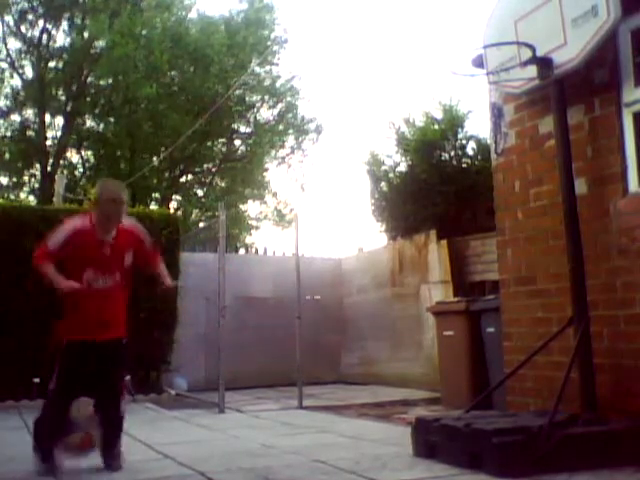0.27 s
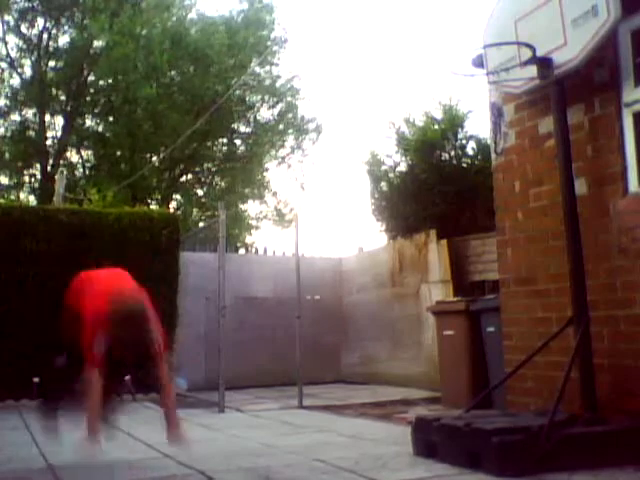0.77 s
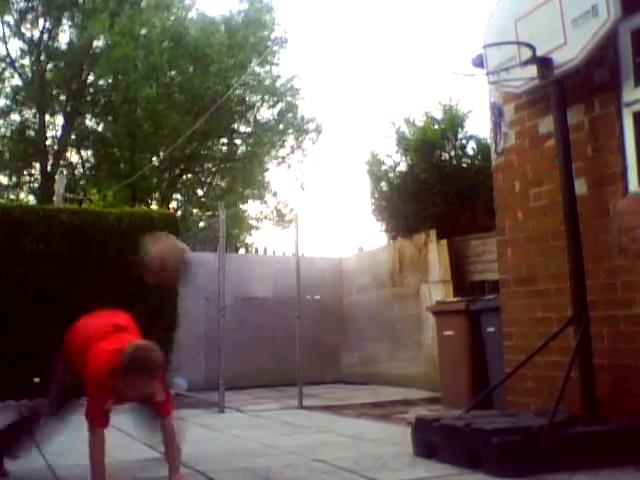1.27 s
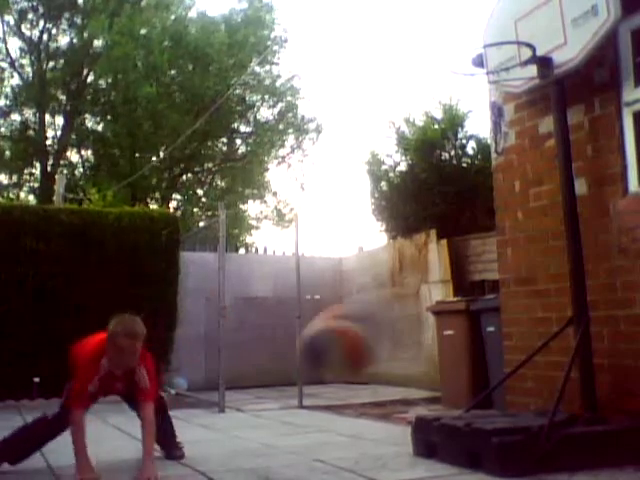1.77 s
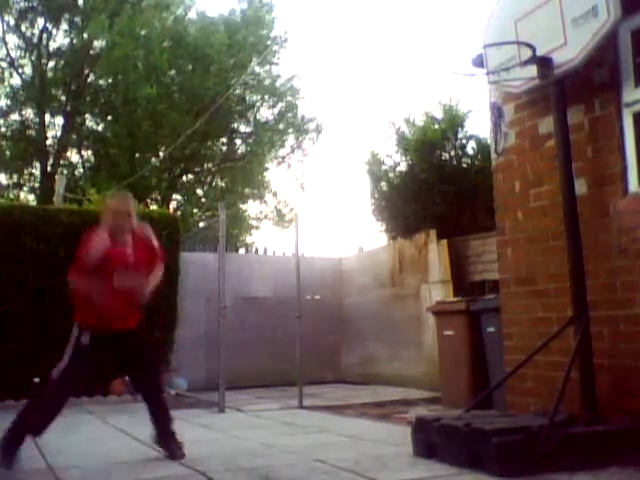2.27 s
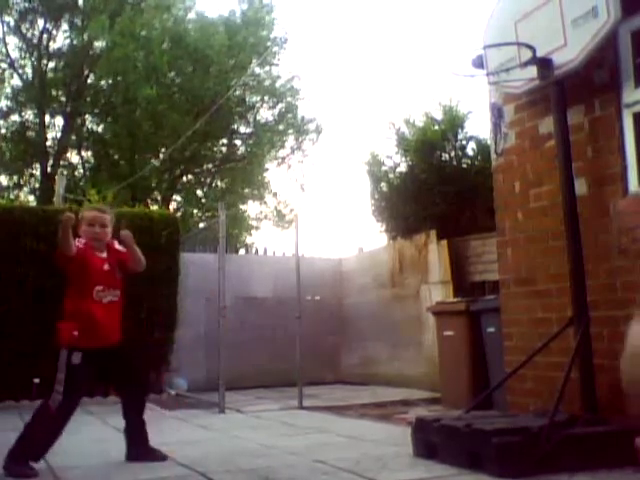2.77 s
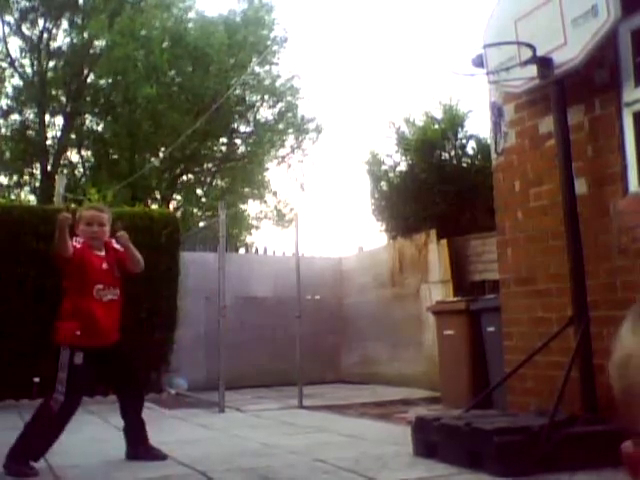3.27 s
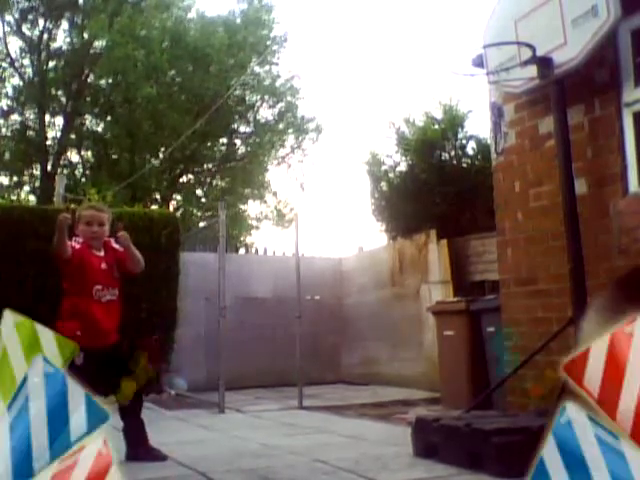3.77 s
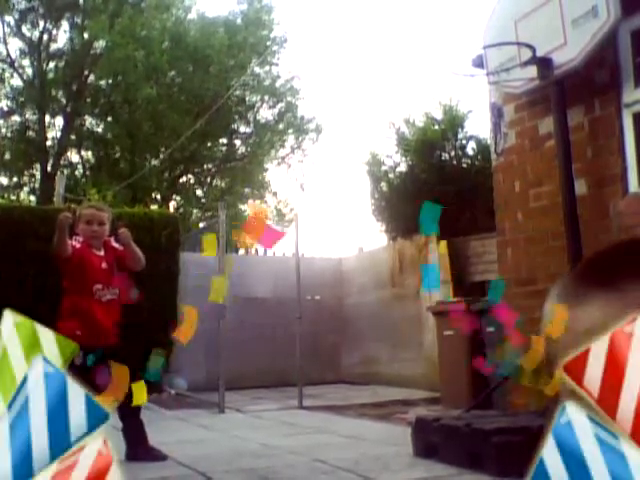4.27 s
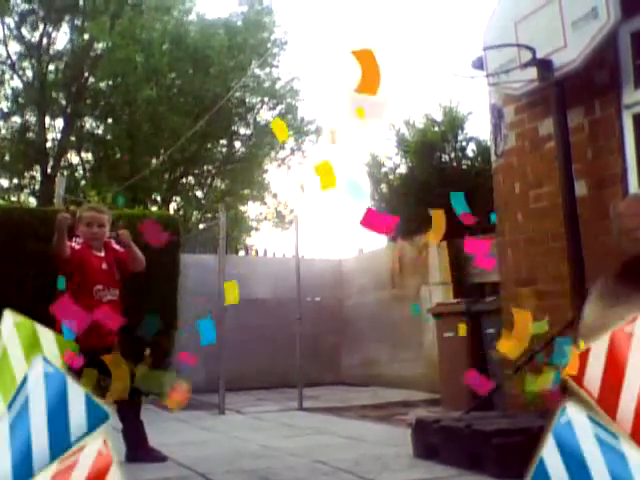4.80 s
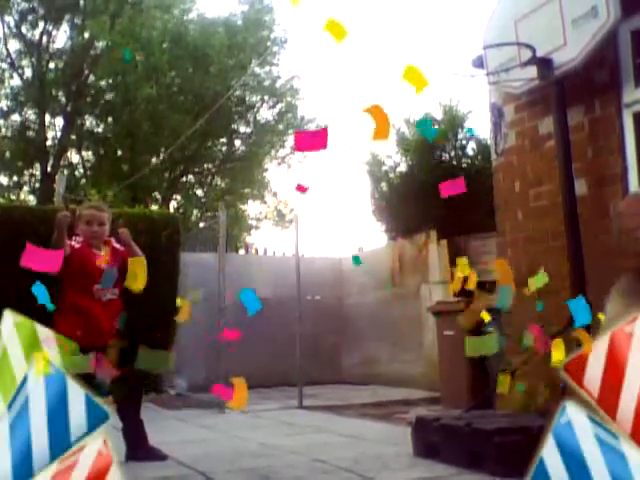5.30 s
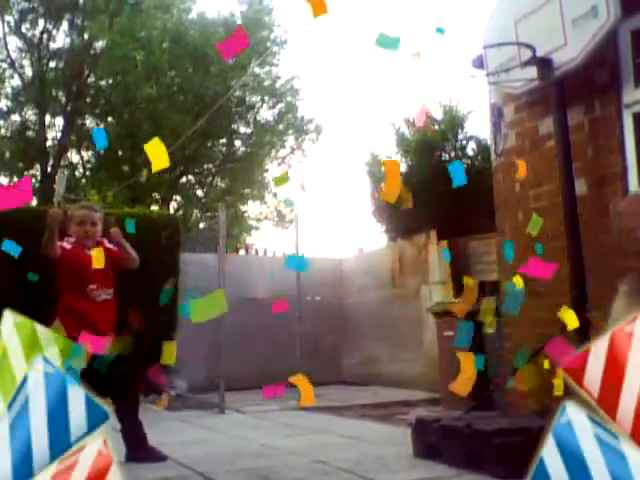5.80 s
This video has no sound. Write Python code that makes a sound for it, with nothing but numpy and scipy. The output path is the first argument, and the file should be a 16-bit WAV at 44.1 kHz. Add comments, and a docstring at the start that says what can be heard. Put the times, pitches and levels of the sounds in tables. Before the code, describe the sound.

In a walled back yard, hands and shoes land softly on concrete slabs. A basketball then bounces unevenly, each bounce a low thump with a rubbery slap and a faint ping. It knocks against something hollow a few times, and the bounces weaken and stop. Light shoe taps remain. One microphone picks up a steady low hum and faint distant town noise throughout, and the brief echoes are cut short.

```python
"""Walled back yard, concrete slabs: a basketball, flicked up with the heels, bounces to rest.
Each bounce is a low thump, a rubber slap, a ping of the air inside and a tick of grit, scattered by
the walls. The ball also knocks something hollow; hands and shoes land on the paving.
A low hum and a distant town run underneath. The recorder's noise gate chops the tails."""
import sys
import numpy as np
from scipy import signal
from scipy.fft import rfft, irfft
from scipy.io import wavfile
from scipy.ndimage import uniform_filter1d

SR = 44100
rng = np.random.default_rng(int(sys.argv[2]) if len(sys.argv) > 2 else 0)


def wrap_up_sound(samples):
    """Save the sound to the file named by the first command line argument, as 16-bit audio."""
    columns = np.atleast_2d(samples).T
    # keep every value between -1 and 1, then stretch to whole-number steps
    tamed = np.clip(columns, -1, 1)
    steps = np.round(tamed * 32767).astype(np.int16)
    wavfile.write(sys.argv[1], SR, steps)


N = 266628
AGE_S = np.arange(SR // 2) / SR  # time since contact

# contact spectra, low to high: (frequency [Hz], relative level [dB])
SLAP_SPECTRUM = [(250, -20.5), (400, 0), (520, -1), (620, 1.5), (740, 1.5), (930, 2), (1100, -5),
                 (1600, -22.5), (3000, -42)]
PING_SPECTRUM = [(700, -24.5), (1100, -4.5), (1350, 1), (1700, -4.5), (2050, -12.5), (2400, -12.5),
                 (2800, -28), (4500, -35.5)]
GRIT_SPECTRUM = [(1800, -13), (2600, -7), (3350, 2), (4000, -1.5), (4600, -19.5), (6000, -34)]
SAND_SPECTRUM = [(3800, -21), (4800, -2), (5500, 3.5), (6400, 7.5), (7200, -0.5), (8200, -20.5)]


def undb(db):
    """Decibels to gain."""
    return 10 ** (np.asarray(db) / 20)


def fade(t60_s):
    """Exponential decay from contact."""
    return np.exp(-np.log(1000) * AGE_S / t60_s)


def colour(x, spectrum, size=4096):
    """Minimum-phase, unit-energy filter through (frequency [Hz], level [dB]) points."""
    hz, db = np.transpose(spectrum)
    grid_hz = np.maximum(np.fft.rfftfreq(size, 1 / SR), 1)
    octaves_above = np.maximum(np.log2(grid_hz / hz[-1]), 0)
    gain = undb(np.interp(np.log(grid_hz), np.log(hz), db) - 20 * octaves_above)
    cepstrum = irfft(np.log(gain))
    cepstrum[1:size // 2] *= 2
    cepstrum[size // 2 + 1:] = 0
    response = irfft(np.exp(rfft(cepstrum)))
    return signal.fftconvolve(x, response / np.linalg.norm(response))[:len(x)]


def drift(rate_hz):
    """Random drift, spread near 1."""
    hold = int(SR / rate_hz)
    steps = np.repeat(rng.standard_normal(N // hold + 1), hold)
    return uniform_filter1d(steps, hold)[:N]


def add(track, start_s, sound):
    """Mix a sound into the track."""
    i = int(start_s * SR)
    track[i:i + len(sound)] += sound[:N - i]


def patter(powers, spectra, clump_db=2.0):
    """Dense tiny impulses as clumped noise; one power curve per spectrum."""
    clumps = undb(clump_db * drift(400))
    return sum(colour(np.sqrt(power) * clumps * rng.standard_normal(N), spectrum)
               for power, spectrum in zip(powers, spectra))


def thump(db, hz, cycles):
    """Squash and rebound: a sine that peaks after `cycles` periods, then dies."""
    swell = AGE_S * hz / cycles
    return -undb(db) * np.sin(2 * np.pi * hz * AGE_S) * swell * np.exp((1 - swell ** 2) / 2)


def background(hum_hz=90, waver_db=0.9, town_db=-53, swell_db=-1.03):
    """Low, slightly wavering hum over a faint distant town."""
    # hum: (time [s], RMS level [dB])
    hum_levels = [(0, -44.5), (3.2, -46), (4.3, -47), (6.05, -46.5)]
    # distant town: (frequency [Hz], relative level [dB])
    town_spectrum = [(20, -6), (38, -5), (65, -10.5), (130, -16.5), (250, -22.5), (400, -28), (620, -31),
                     (930, -30), (1300, -35), (2000, -37), (2700, -52), (4000, -58.5), (6000, -72)]
    time_s = np.arange(N) / SR
    turns = np.cumsum(hum_hz + 0.1 * drift(3.2)) / SR
    hum_db = np.interp(time_s, *np.transpose(hum_levels)) + waver_db * drift(2.1)
    hum = np.sqrt(2) * np.sin(2 * np.pi * turns) * undb(hum_db)
    town = colour(rng.standard_normal(N), town_spectrum) * undb(town_db + swell_db * drift(5))
    return hum + town


def scuffs(landing_rise_s=0.0026, tap_rise_s=0.0016, t60_ratio_per_band=0.83):
    """Hands and shoes land and tap on the slabs, and clothing swishes once: slight skid, no ring."""
    # landings, light taps: (time [s], level [dB], tilt [dB/band], t60 [s])
    landings = [(0.785, -47.5, 1.5, 0.26), (0.82, -50, 0, 0.17), (1.046, -52, -3, 0.12),
                (1.431, -43.5, -2, 0.19)]
    taps = [ (0.693, -61, -1, 0.065), (2.536, -53, 2, 0.28), (2.938, -42.5, -1, 0.063),
            (3.534, -63.5, -6.5, 0.33), (3.568, -56, 0.5, 0.089), (3.611, -60.5, 4.5, 0.16),
            (3.677, -61, 2.5, 0.11), (4.047, -53.5, 3.5, 0.11), (4.458, -55, 4.5, 0.042),
            (4.974, -54.5, 1, 0.096), (5.288, -62.5, -10.5, 0.05), (5.329, -59.5, -8, 0.061),
            (5.675, -69, -8, 0.28)]
    # band levels per contact type: (pat [dB], slap [dB], ping [dB], grit [dB], sand [dB])
    landing_mix = (2, -2.5, -24.5, -17.5, -35)
    tap_mix = (1.5, 1, -6.5, -38.5, -38)
    slide_mix = (-88, -76, -67.5, -75, -85.5)
    # dull pat: (frequency [Hz], relative level [dB])
    pat_spectrum = [(60, -18.5), (130, -12.5), (200, -10), (275, -1), (330, -6), (370, -13), (450, -5),
                    (560, -25.5), (900, -44)]
    bands = np.arange(5) - 1  # slap = 0, pivot of tilt and t60
    contacts = []
    for events, rise_s, mix in (landings, landing_rise_s, landing_mix), (taps, tap_rise_s, tap_mix):
        for start_s, db, tilt_db, t60_s in events:
            contacts.append((start_s, rise_s, t60_s, db + tilt_db * bands + np.array(mix)))
    contacts.append((1.606, 0.13, 0.5, slide_mix))  # faint swish of clothing
    powers = np.zeros((5, N))
    for start_s, rise_s, t60_s, levels_db in contacts:
        for power, db, band in zip(powers, levels_db, bands):
            envelope = np.minimum(AGE_S / rise_s, 1) * fade(t60_s * t60_ratio_per_band ** band)
            add(power, start_s, (undb(db) * envelope / envelope.max()) ** 2)
    return patter(powers, (pat_spectrum, SLAP_SPECTRUM, PING_SPECTRUM, GRIT_SPECTRUM, SAND_SPECTRUM))


def knocks():
    """Ball against something hollow: a short note plus its octave."""
    # knocks: (time [s], level [dB], pitch [Hz], rise [cycles], octave re note [dB])
    hits = [(1.768, -27, 133, .6, -13), (3.367, -24.5, 170.4, 0.59, -31), (3.384, -35.5, 181, 1.06, -22),
            (3.781, -32.5, 190.6, 0.76, -29), (4.341, -40.5, 253.4, 2.46, -11.5)]
    out = np.zeros(N)
    for start_s, db, hz, cycles, octave_db in hits:
        add(out, start_s, thump(db, hz, cycles) + thump(db + octave_db, 2 * hz, 2 * cycles))
    return out


def cavity(spot_db=2.0, detune_share=0.0023):
    """The enclosed air rings, slightly differently for each spot struck."""
    # air modes in the ball: (frequency [Hz], relative level [dB], t60 [s])
    modes = [(620, -9, 0.25), (742, -2.5, 0.064), (890, 0, 0.2), (939, 2.5, 0.084), (1057, -6.5, 0.33),
             (1337, -4.5, 0.068), (1600, -6, 0.027), (1710, -3.5, 0.037), (1817, -0.5, 0.065),
             (2060, -10.5, 0.092), (2240, -18.5, 0.026), (3040, -39.5, .07)]
    ring = 0
    for hz, db, t60_s in modes:
        detune, strength = rng.standard_normal(2)
        tone = np.sin(2 * np.pi * hz * (1 + detune_share * detune) * AGE_S)
        ring = ring + undb(db + spot_db * strength) * fade(t60_s) * tone
    return ring


def bounce_envelopes(yard_t60_s, yard_db=-5, build_s=0.0033, squash_s=0.00055):
    """Rubber on concrete plus wall scatter: shell, slap, ping, grit and sand envelopes."""
    scatter = undb(yard_db) * (1 - np.exp(-AGE_S / build_s))
    blow = np.hypot(fade(t60_s=0.044), scatter * fade(yard_t60_s))
    soft = blow * (1 - np.exp(-AGE_S / squash_s))  # low bands swell as the ball flattens
    tick = fade(t60_s=0.012)  # treble dies sooner, at the contact and among the walls
    grit = np.hypot(tick, undb(-3) * scatter * fade(0.35 * yard_t60_s))
    sand = np.hypot(tick, undb(-3) * scatter * fade(0.29 * yard_t60_s))
    return soft, soft, blow, grit, sand


def ball(noise_gain_db=2.0, boom_lag_s=0.033):
    """Each bounce thumps, rings the air inside, shakes the shell and crunches grit; a boom follows."""
    # bounces: (time [s], blow [dB], grit [dB], sand [dB], thump [dB], thump pitch [Hz],
    # thump rise [cycles], boom [dB], yard t60 [s])
    bounces = [ (1.063, -49, -45, -60.5, -31, 120.3, 2.05, -28.5, 0.41),
               (1.397, -46, -54.5, -92, -55, 131, .7, -58, 0.34),
               (1.731, -37.5, -46.5, -54, -21.5, 116, 0.64, -37.5, 0.35),
               (2.399, -41, -59.5, -63, -22, 111, 0.47, -35.5, 0.29),
               (2.922, -44, -84, -76.5, -29.5, 83, 1.05, -54, 0.098),
               (3.348, -43.5, -53, -77, -28.5, 82.3, 0.53, -28.5, 0.16),
               (3.779, -44, -88, -66.5, -31, 79.5, 0.77, -62, 0.097),
               (4.283, -55.5, -69, -76, -30, 88, 0.23, -56, 0.18),
               (4.337, -50, -72, -88, -48, 120, 0.71, -45, 0.063)]
    # rubber shell: (frequency [Hz], relative level [dB])
    shell_spectrum = [(25, -5), (60, -4.5), (120, -5), (190, 5), (265, -6), (320, -6.5), (365, -7.5),
                      (480, -17.5), (900, -52.5)]
    shell_db, slap_db, ping_db, ring_db = 5.5, -2.5, -7, -7.5  # offsets from the blow
    note_max_db, note_db_per_db = -38.5, 3.3  # shell note drops steeply on softer blows
    hardest_db = max(row[1] for row in bounces)
    tones, powers = np.zeros(N), np.zeros((5, N))
    for start_s, blow_db, grit_db, sand_db, thump_db, hz, cycles, boom_db, yard_t60_s in bounces:
        shell_note = thump(note_max_db - note_db_per_db * (hardest_db - blow_db), hz=369, cycles=5.3)
        air_ring = undb(blow_db + ring_db) * cavity()
        add(tones, start_s, thump(thump_db, hz, cycles) + air_ring + shell_note)
        add(tones, start_s + boom_lag_s, thump(boom_db, hz=98.8, cycles=2.08))
        levels_db = blow_db + shell_db, blow_db + slap_db, blow_db + ping_db, grit_db, sand_db
        for power, db, envelope in zip(powers, levels_db, bounce_envelopes(yard_t60_s)):
            add(power, start_s, (undb(db) * envelope) ** 2)
    spectra = shell_spectrum, SLAP_SPECTRUM, PING_SPECTRUM, GRIT_SPECTRUM, SAND_SPECTRUM
    return tones + undb(noise_gain_db) * patter(powers, spectra)


def scene():
    """The yard at one microphone."""
    return (ball() + knocks() + scuffs() + background())[None]


def gate(x, threshold_db=-51.5, depth_db=-10, window_s=0.02, knee=4, key_hz=143):
    """Soft gate: gain drops when the sound above the hum falls under the threshold."""
    key = signal.sosfiltfilt(signal.butter(4, key_hz, "high", fs=SR, output="sos"), x)
    size = int(window_s * SR)
    rms = np.sqrt(np.abs(uniform_filter1d(key ** 2, size, origin=size // 3)) + 1e-18)
    opening = 1 / (1 + (undb(threshold_db) / rms) ** knee)
    return x * undb(depth_db * (1 - opening))


def record(dry, hiss_db=-89.5, cutoff_hz=8200):
    """Small recorder: noise gate, faint hiss, steep low-pass."""
    # self-noise: (frequency [Hz], relative level [dB])
    hiss_spectrum = [(1000, 1.5), (2800, 0.5), (3900, -3.5), (5000, -9), (6800, -11.5), (8200, -14)]
    hiss = undb(hiss_db) * colour(rng.standard_normal(N), hiss_spectrum)
    low_pass = signal.ellip(8, 0.2, 70, cutoff_hz, fs=SR, output="sos")
    return signal.sosfilt(low_pass, gate(dry) + hiss)


dry = scene()
out = record(dry)
wrap_up_sound(out)
```